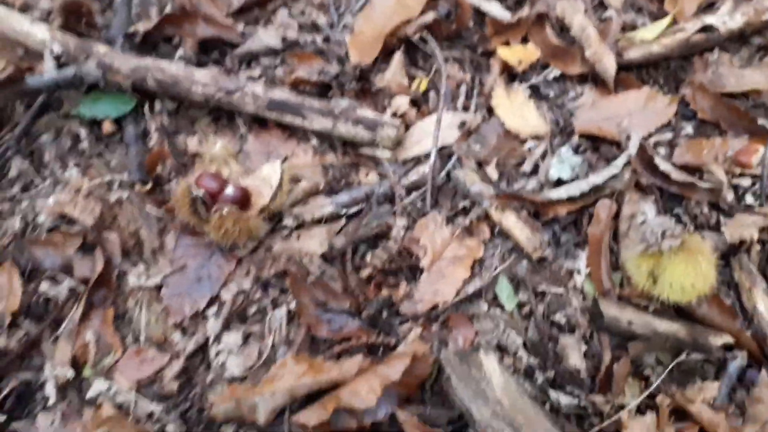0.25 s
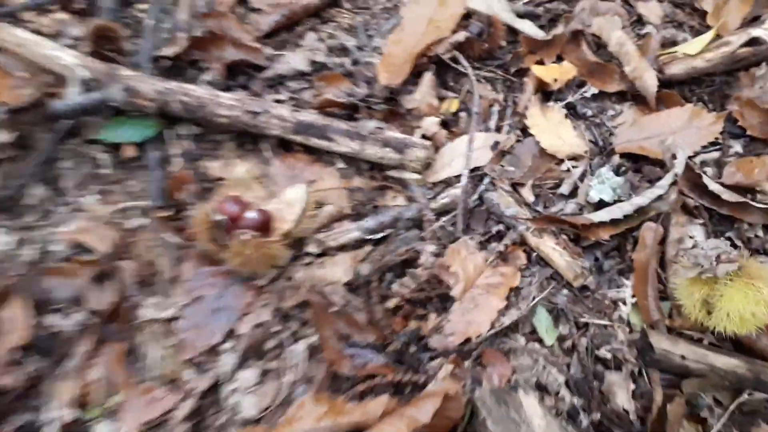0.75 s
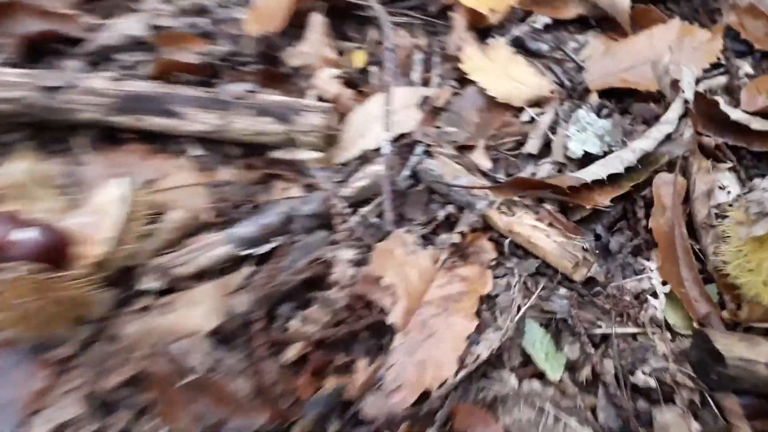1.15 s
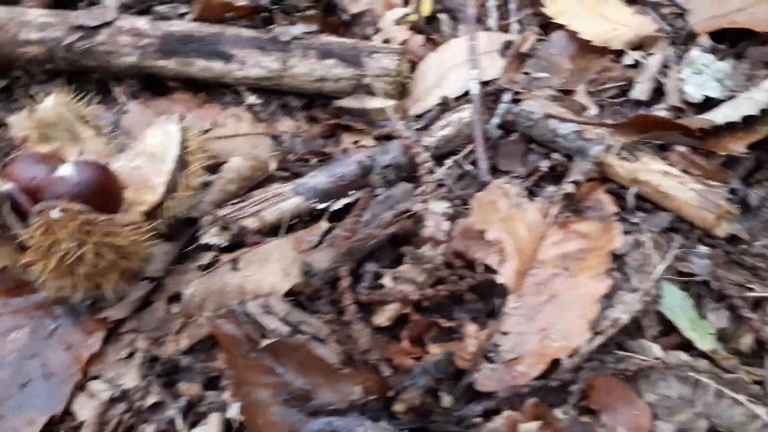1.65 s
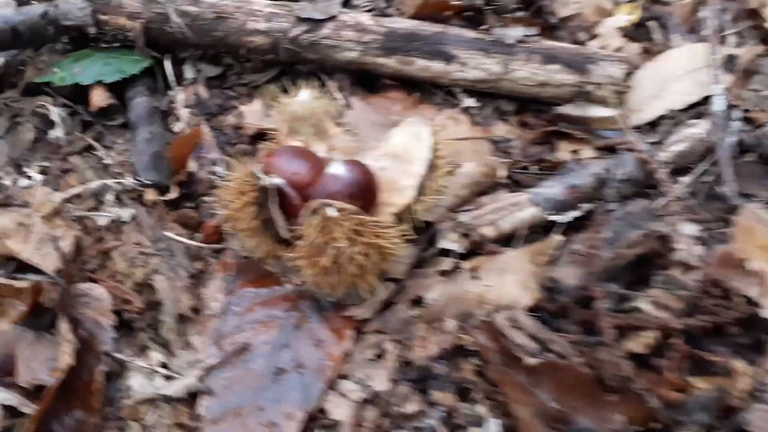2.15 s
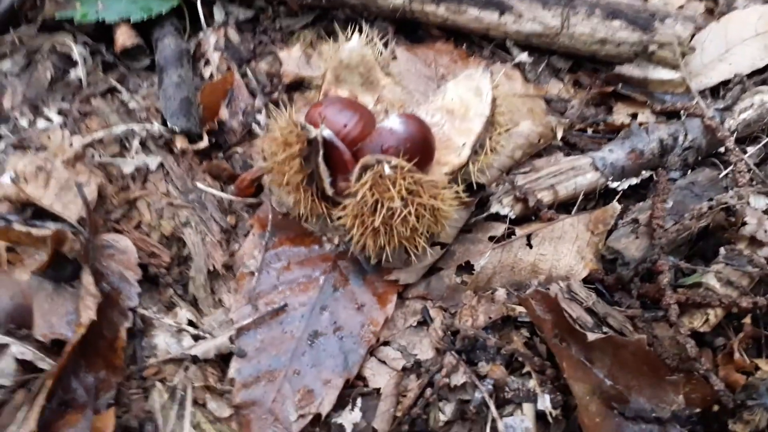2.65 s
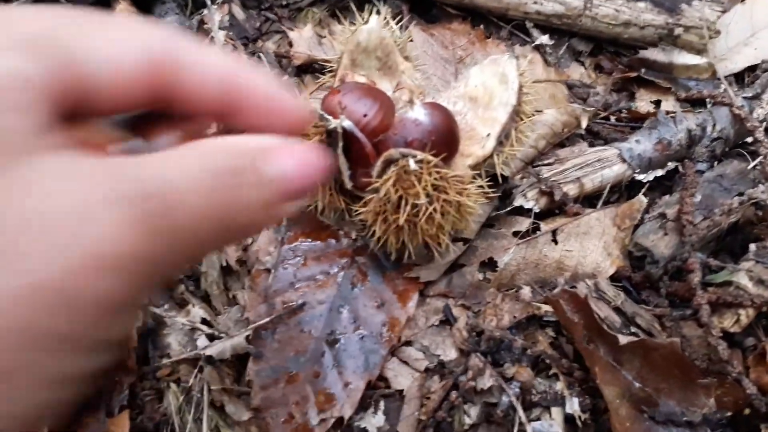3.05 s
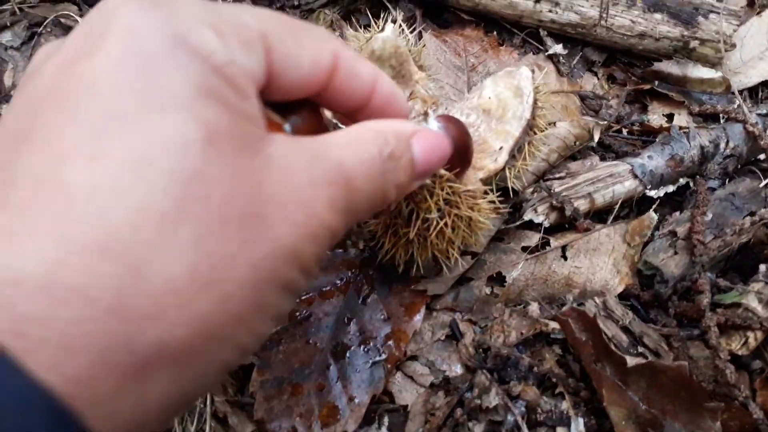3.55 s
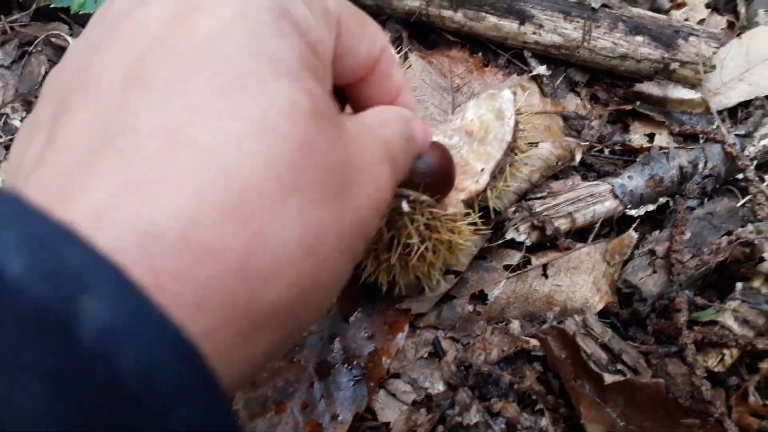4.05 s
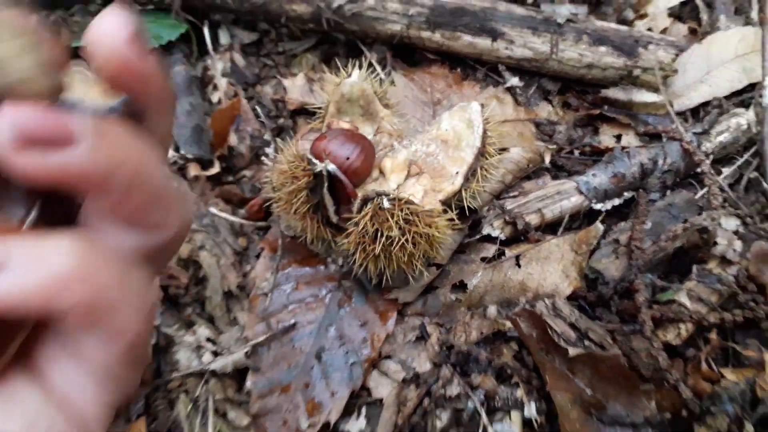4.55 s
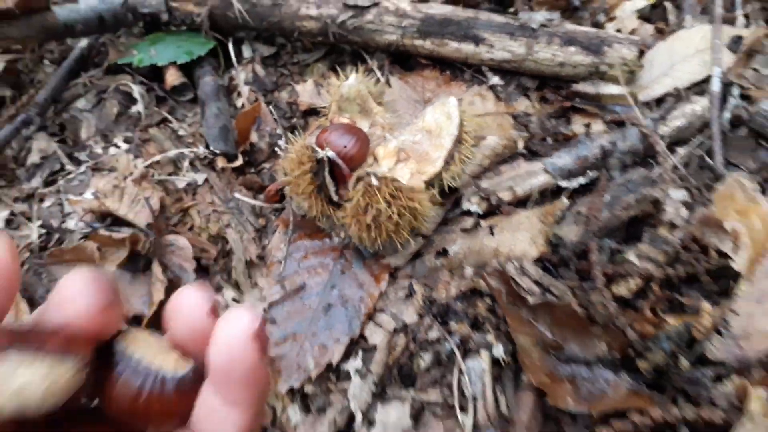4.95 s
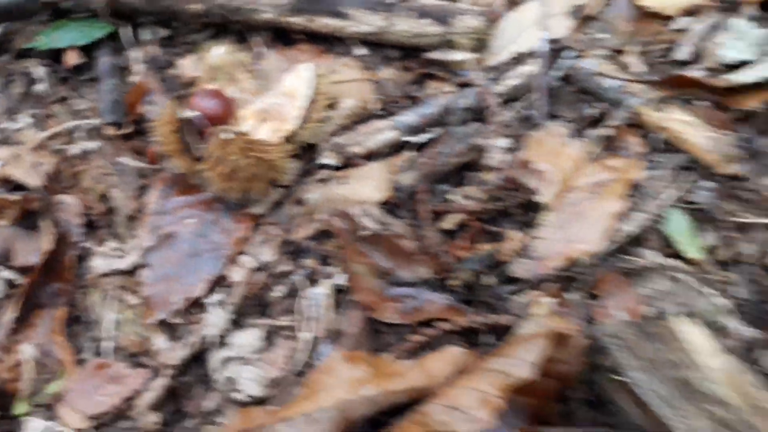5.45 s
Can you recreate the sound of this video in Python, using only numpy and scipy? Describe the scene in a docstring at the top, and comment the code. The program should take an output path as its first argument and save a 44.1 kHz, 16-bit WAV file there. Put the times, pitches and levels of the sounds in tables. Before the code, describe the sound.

A step crushes crisp leaf litter, a twig cracks loudly, then delicate crackles and clicks continue over a soft, airy forest hiss.

```python
"""Dry leaves brush underfoot and the first twigs snap: someone steps through leaf litter in a wood,
crouches and picks a chestnut out of its spiny husk; spines and nuts tick under the fingers.
Snaps are impulses ringing in two damped modes; leaves are random trains of tiny fractures, filtered.
Thuds are damped low sines; cloth is resonant noise; hiss and faint far rumble are coloured noise.
A decaying noise response adds the scatter of the trunks."""
import sys
import numpy as np
from scipy import signal
from scipy.fft import rfft, irfft
from scipy.io import wavfile

SR = 44100
rng = np.random.default_rng(int(sys.argv[2]) if len(sys.argv) > 2 else 0)


def transcribe(signal):
    """Save signal, clipped to [-1, 1], as a 16-bit WAV file at the path in sys.argv[1]."""
    frames = np.atleast_2d(signal).T
    limited = np.clip(frames, -1, 1)
    pcm = np.round(limited * 32767).astype(np.int16)
    wavfile.write(sys.argv[1], SR, pcm)


N = 251370   # samples
TIME = np.arange(N) / SR   # s


def from_db(db):
    """Level definition: decibels to amplitude gain."""
    return 10 ** (np.asarray(db) / 20)


def rms_one(x):
    """Normalization: scale a signal to unit rms."""
    return x / np.sqrt(np.mean(x ** 2) + 1e-20)


def in_time(rows):
    """Linear interpolation: each column of a curve at every sample."""
    s, *columns = np.transpose(rows)
    return [np.interp(TIME, s, c) for c in columns]


def swell(corners_s):
    """Triangular envelope: a linear rise and fall through three times, put in order first."""
    return np.interp(TIME, np.sort(corners_s), [0, 1, 0])


def band(x, low_hz, high_hz, order=2):
    """Band limitation: a causal Butterworth band-pass."""
    edges = [low_hz, min(high_hz, .48 * SR)]
    sos = signal.butter(order, edges, "band", fs=SR, output="sos")
    return signal.sosfilt(sos, x + 1e-18)


def resonance(x, hz, width_hz):
    """Damped resonance: a pole pair whose radius sets the bandwidth, with gain about 1 at its top."""
    r = np.exp(-np.pi * width_hz / SR)
    zeros = (1 - r * r) / 2 * np.array([1, 0, -1])
    poles = [1, -2 * r * np.cos(2 * np.pi * hz / SR), r * r]
    return signal.lfilter(zeros, poles, x)


def coloured(x, spectrum):
    """Minimum phase: a folded cepstrum gives the causal filter of a spectrum, scaled to unit power."""
    size = 8192
    hz, db = np.transpose(spectrum)
    grid = np.maximum(np.arange(size // 2 + 1) * SR / size, 1)
    gain = from_db(np.interp(np.log(grid), np.log(hz), db))
    cepstrum = irfft(np.log(gain))
    cepstrum[1:size // 2] *= 2
    cepstrum[size // 2 + 1:] = 0
    response = irfft(np.exp(rfft(cepstrum)))
    return signal.fftconvolve(x, response / np.linalg.norm(response))[:N]


def grains(per_s, spread_db):
    """Shot noise: tiny fractures at random moments, some larger than the rest; power about 1."""
    sizes = rms_one(from_db(spread_db * np.minimum(rng.exponential(1, N), 3)))
    chance = np.clip(per_s / SR, 1e-6, 1)   # per sample
    breaks = rng.random(N) < chance
    return breaks * sizes * rng.choice([-1, 1], N) / np.sqrt(chance)


def flicker(rate, depth_db):
    """Random amplitude modulation: a gain in dB that heads for a new value rate times a second."""
    steps = rng.standard_normal(4096)
    return from_db(depth_db * np.interp(TIME * rate, np.arange(len(steps)), steps))


# level of the hiss of the wood: t/s, level/dB
HISS_LEVEL = [(0.0, -46.5), (0.13, -50.5), (0.3, -50.5), (0.71, -49.5), (0.84, -52), (1.22, -46),
              (1.48, -52), (1.7, -50.5), (1.89, -48.5), (2.06, -49), (2.35, -52), (2.68, -52.5),
              (3.0, -50.5), (3.35, -52.5), (3.97, -52), (5.22, -50), (5.7, -48)]
# spectrum of the hiss: f/Hz, relative level/dB
HISS_SPECTRUM = [(300, -18.5), (520, -14.5), (780, -4), (1050, -1), (1600, -2), (2500, 1.5), (3400, -0.5),
                 (4500, 1.5), (6000, -6.5), (7800, -9.5), (10000, -7), (11300, -15.5), (14000, -17.5),
                 (16000, -23)]
# hiss ranges, the treble swelling most: low f/Hz, high f/Hz, relative level/dB, follow/(dB per dB of swell)
HISS_BANDS = [(398, 1565, -11.5, 1.0), (1500, 6080, -1.5, 1.0), (5930, 20000, -6.5, 1.1)]
# far rumble: t/s, level/dB
RUMBLE_LEVEL = [(0, -62), (1.0, -64), (2.2, -64), (3.2, -63), (4.8, -62.5), (5.7, -63)]
# spectrum of the rumble: f/Hz, relative level/dB
RUMBLE_SPECTRUM = [(20, -29), (45, -18), (68, 0.5), (100, -3.5), (125, 3.5), (165, -4.5), (240, -6.5),
                   (330, -13), (480, -20.5), (900, -44)]


def wood():
    """Filtered noise: far hiss in three ranges that swell together and stir slightly, over a low rumble."""
    level_db, = in_time(HISS_LEVEL)
    rumble_db, = in_time(RUMBLE_LEVEL)
    usual_db = level_db.mean()
    out = from_db(rumble_db) * coloured(rng.standard_normal(N), RUMBLE_SPECTRUM)
    for low_hz, high_hz, range_db, follows in HISS_BANDS:
        hiss = band(coloured(rng.standard_normal(N), HISS_SPECTRUM), low_hz, high_hz, order=4)
        stirred = rms_one(hiss * flicker(rate=40, depth_db=1.0))
        out += from_db(usual_db + range_db + follows * (level_db - usual_db)) * stirred
    return out


def trunks(x, t60=0.69, echo_db=-26):
    """Diffuse scattering: trunks and ground return a faint, dull tail, decaying 60 dB per t60 seconds."""
    t = TIME[:SR // 2]
    build_up = 1 - np.exp(-t / 0.0076)
    tail = band(rng.standard_normal(len(t)), 700, 4300, order=1) * from_db(-60 * t / t60) * build_up
    return from_db(echo_db) * signal.fftconvolve(x, tail / np.linalg.norm(tail))[:N]


# clothes brushing in the stride and the crouch:
# start t/s, peak t/s, end t/s, level/dB, centre f/Hz, width of each resonance/Hz
CLOTH_SWISHES = [(0, .3, 0.55, -69, 334, 250), (0.93, 1.303, 1.57, -58, 660, 600),
                 (1.15, 1.635, 2.04, -66, 235, 236), (1.75, 2.025, 2.3, -59.5, 2580, 450)]


def clothes():
    """Friction noise: fabric slides on fabric in soft swells, each through one broad double resonance."""
    out = np.zeros(N)
    for start, peak, end, level_db, hz, width_hz in CLOTH_SWISHES:
        rubbing = resonance(resonance(rng.standard_normal(N), hz, width_hz), hz, width_hz)
        out += from_db(level_db) * swell([start, peak, end]) * rms_one(rubbing)
    return out


# weight landing on soft soil: t/s, relative level/dB, f/Hz, decay time/s
SOIL_THUDS = [(.345, -51, 227, .012), (0.357, -36, 220, 0.0042), (.402, -56.5, 275, 0.016),
              (0.791, -54, 217, 0.016)]


def thuds(rise_s=0.0019, crumble_share=0.48):
    """Damped oscillation: soil answers each push with a few low cycles and a dull crumbling."""
    out = np.zeros(N)
    crumbling = crumble_share * rms_one(band(rng.standard_normal(N), 130, 750))
    for s, level_db, hz, decay in SOIL_THUDS:
        t = np.maximum(TIME - s, 0)
        push = (1 - np.exp(-t / rise_s)) * np.exp(-np.minimum(t / decay, 20))
        out += 2 * from_db(level_db) * push * (np.sin(2 * np.pi * hz * t) + crumbling)
    return band(out, 90, 830, order=1)


# how hard the litter is stirred, in the stride, at rest, under the hand and on rising: t/s, effort level/dB
STIRRING = [(0, 5.5), (.75, 3), (1.4, -5), (2.25, 1), (2.55, -7.5), (3.1, -4.5), (3.7, -1), (4.3, -2.5),
            (5.3, -2), (5.7, 1)]
# leaves and spines that crack: low f/Hz, high f/Hz, relative level/dB
LEAF_BANDS = [(1290, 3600, 0.5), (3230, 6600, -1.5), (3000, 6700, 2), (7950, 12000, -2.5),
              (9300, 10600, -6)]
CRACKS_PER_S, CRACKLE_DB = 105, -58.5   # all leaves together, at 0 dB of effort
CRACKS_GROW = 1.2   # dB of rate per dB of effort


def crackle():
    """Random point process: lone cracks, louder and more frequent with effort, each leaf in its own band."""
    effort_db, = in_time(STIRRING)
    per_s = CRACKS_PER_S * from_db(CRACKS_GROW * effort_db)
    cracks = np.zeros(N)
    for low_hz, high_hz, leaf_db in LEAF_BANDS:
        clicks = grains(per_s / len(LEAF_BANDS), spread_db=4.5)
        cracks += from_db(leaf_db) * rms_one(band(clicks, low_hz, high_hz))
    return from_db(CRACKLE_DB + effort_db) * rms_one(cracks)


# shoes brushing through leaves, the three times in any order:
# start t/s, peak t/s, end t/s, level/dB, share of fine fizz (0-1, of power)
LEAF_SCUFFS = [(0, 0.001, 0.11, -42.5, 0.08), (.06, 0.096, 0.12, -37, 0), (0.126, .14, 0.23, -49.5, 0.7),
               (0.33, 0.355, 0.37, -35, .3), (0.35, .409, 0.44, -41, 0.8), (.43, 0.588, 0.7, -43, 0.74),
               (0.723, 0.75, .765, -47, .3), (.82, 0.864, 0.95, -45.5, 0.6), (0.96, 1.12, 1.6, -51, 0.7),
               (5.487, 5.534, 5.46, -46, 1)]
# spectrum of the papery part: f/Hz, relative level/dB
PAPER_SPECTRUM = [(60, -51), (200, -30), (450, -12), (750, -15.5), (1200, -28), (2400, -25), (3500, -1.5),
                  (4600, 2.5), (5800, -16.5), (7800, -14), (10000, 0.5), (11500, -9), (16000, -21)]
# spectrum of the fine fizz: f/Hz, relative level/dB
FIZZ_SPECTRUM = [(60, -15), (300, -7), (750, 9.5), (1200, -2.5), (2500, 8), (4000, 6.5), (7500, 3.5),
                 (10000, -6), (12500, 3), (16000, -4)]


def scuffs():
    """Stick-slip friction: leaves slide in swells of clumped grains, partly papery, partly a fine fizz."""
    papery, fizzy = np.zeros(N), np.zeros(N)   # powers
    for start, peak, end, level_db, fizz in LEAF_SCUFFS:
        power = from_db(level_db) ** 2 * swell([start, peak, end]) ** 2
        share = np.clip(fizz, 0, 1)
        papery += power * (1 - share)
        fizzy += power * share
    catching = rms_one(flicker(rate=410, depth_db=3.5))   # edges catch and slip
    paper_grains = np.sqrt(papery) * catching * grains(per_s=6600, spread_db=6.0)
    fizz_grains = np.sqrt(fizzy) * catching * grains(per_s=6500, spread_db=6.0)
    return coloured(paper_grains, PAPER_SPECTRUM) + coloured(fizz_grains, FIZZ_SPECTRUM)


# the sole crushing the litter: t/s, level/dB
SOLE_CRUSH = [(.765, -46), (.781, -38.5), (.79, -29.5), (.801, -33.5), (.813, -30), (.825, -29.5),
              (.834, -32), (.845, -42), (.87, -62)]
# spectrum of the crushing: f/Hz, relative level/dB
CRUSH_SPECTRUM = [(50, -43), (130, -22.5), (450, -20.5), (1050, -15), (1350, -18), (2300, -11.5),
                  (3600, -6), (5200, -14.5), (8000, -17.5), (10000, -19.5), (16000, -19)]


def crush():
    """Dense fracture noise: under the full weight many leaves break at once, in quick clumps."""
    level_db, = in_time(SOLE_CRUSH)
    pressed = (TIME > SOLE_CRUSH[0][0]) & (TIME < SOLE_CRUSH[-1][0])
    clumps = rms_one(flicker(rate=500, depth_db=1.0))
    breaking = pressed * from_db(level_db) * clumps * grains(per_s=4200, spread_db=5.5)
    return coloured(breaking, CRUSH_SPECTRUM)


# twigs, stalks and spines that snap clearly: t/s, knock level/dB, crack level/dB, tick level/dB,
# decay time of the tearing/s, low mode f/Hz, high mode f/Hz
CLEAR_SNAPS = [(0.08, -62, -42, -43, .0018, 1980, 9860), (0.231, -60, -43.5, -51, .0008, 2070, 4800),
               (0.3254, -52, -43, -51, 0.0014, 2480, 5040), (0.3875, -40, -38, -44, .0009, 2340, 4260),
               (0.428, -49, -43, -46, 0.0016, 2090, 3850), (0.4905, -64, -40, -32.5, .0006, 2370, 9200),
               (0.661, -49, -39, -42.5, .002, 1880, 4440), (0.667, -40.5, -43, -60, 0.0012, 1430, 3320),
               (0.7366, -56, -42, -61, .0017, 2350, 4500), (0.795, -33, -25.5, -52, .0014, 1000, 3940),
               (0.8054, -36.5, -25, -50, .0022, 1150, 3440), (0.817, -36, -25.5, -52, .0007, 1810, 3920),
               (0.8234, -44, -27.5, -37, 0.0039, 2400, 3940), (0.906, -47, -41.5, -42.5, .001, 1850, 2970),
               (1.049, -69, -37.5, -59, .0025, 1490, 4300),
               (1.0714, -31.5, -42, -34.5, 0.00081, 1880, 4700),
               (1.2535, -26.5, -14, -33, 0.00087, 1710, 4930), (1.4998, -45, -52, -65, 0.00054, 2150, 3290),
               (1.642, -55, -56, -46, 0.0024, 2450, 4200), (1.758, -44, -44, -53, 0.0014, 1160, 3100),
               (2.121, -66, -44.5, -50, .0007, 2480, 5120), (2.3398, -64, -50.5, -52, .0008, 2280, 5840),
               (2.412, -54, -48, -68, .0007, 2130, 4870), (2.7206, -49.5, -62, -51, .0016, 2000, 4090),
               (2.9225, -47.5, -57, -54, .0008, 1960, 4260), (3.1138, -49, -27, -42, 0.00027, 2500, 4000),
               (3.2224, -37.5, -42, -47, 0.0013, 2080, 8050), (3.253, -41, -43, -40, .0024, 900, 5230),
               (3.582, -52, -48, -49.5, .0025, 2170, 2930), (3.6347, -65, -48.5, -48.5, .0015, 1980, 8400),
               (3.8399, -60, -42.5, -36, 0.00055, 2090, 7000), (3.8682, -53, -54, -46, .0008, 2350, 4520),
               (4.0132, -70, -49.5, -39.5, 0.0013, 2280, 9800),
               (4.1326, -56, -47.5, -52, .0009, 1590, 3270), (4.1415, -66, -52, -49, .0008, 2070, 7770),
               (4.321, -43, -47, -45, 0.0033, 1950, 4600), (4.374, -66, -43, -50, 0.0011, 2330, 5500),
               (4.395, -37, -43, -41.5, .0012, 2040, 3700), (4.5727, -46.5, -57, -48.5, .003, 2020, 4500),
               (4.8347, -64, -45, -44.5, 0.0013, 1830, 10200),
               (4.8532, -44, -37.5, -40, 0.0017, 2620, 4000), (4.923, -64, -44.5, -45, .0014, 1740, 7800),
               (5.129, -42, -40, -39.5, 0.00057, 2505, 4300),
               (5.2277, -42.5, -68, -61, 0.00083, 2000, 3830),
               (5.5261, -45.5, -43.5, -49, 0.00062, 1690, 5140)]
# bands of knock, crack, tick and splinter: low f/Hz, high f/Hz
FRACTURE_BANDS = [(720, 3300), (2900, 6050), (6700, 11400), (11500, 16000)]
SPLINTERS = .16   # noise of the tearing, relative to the fracture impulse
SPLINTER_DB, SPLINTER_GROWS = -11, 1.15   # splinter level at a 0 dB crack; dB per dB of crack


def snaps(shiver_share=0.12, shiver_s=0.0031, strain_share=0.2, strain_s=0.000099,
          low_db=5.0, high_db=8.5, low_width_hz=450, high_width_hz=1200):
    """Impulse excitation: fibres strain, fracture and tear on briefly; the piece rings in two damped modes."""
    size, lead, span = 1500, 90, 270   # samples: whole piece, before the fracture, end of level window
    t, out = (np.arange(size) - lead) / SR, np.zeros(N + size)
    times, knock_db, crack_db, tick_db, *shapes = np.transpose(CLEAR_SNAPS)
    straining = strain_share * np.exp(-abs(t) / strain_s)
    shivering = shiver_share * np.exp(-abs(t) / shiver_s)   # the litter around trembles on
    pieces = []
    for lasts, low_hz, high_hz in zip(*shapes):
        tearing = np.exp(-abs(t) / max(lasts, 1 / SR))
        roughness = np.where(t < 0, straining, tearing + shivering)
        force = (t == 0) + SPLINTERS * rng.standard_normal(size) * roughness
        low = from_db(low_db) * resonance(force, low_hz, low_width_hz)
        high = from_db(high_db) * resonance(force, high_hz, high_width_hz)
        pieces.append(force + low + high)
    splinter_db = SPLINTER_GROWS * crack_db + SPLINTER_DB
    sounds = np.zeros((len(pieces), size))
    for k, level_db in enumerate((knock_db, crack_db, tick_db, splinter_db)):
        part = band(np.array(pieces), *FRACTURE_BANDS[k], order=3)
        # levels are rms over about 4 ms; neighbouring bands have opposite sign
        early = np.sqrt(np.sum(part[:, :span] ** 2, axis=1, keepdims=True) / (span - lead))
        sounds += (-1) ** k * part / early * from_db(level_db)[:, None]
    for s, sound in zip(times, sounds):
        at = int(s * SR) - lead
        out[at:at + size] += sound
    return out[:N]


def scene():
    """Superposition: near sounds, their scatter and the wood behind."""
    near = snaps() + scuffs() + crush() + thuds() + crackle() + clothes()
    return (near + trunks(near) + wood())[None]


CUTOFF_HZ = 15800


def record(dry):
    """Saturation and band limitation: high peaks are rounded and the top is cut steeply."""
    rounded = np.tanh(dry)
    steep = signal.ellip(12, .1, 80, CUTOFF_HZ, fs=SR, output="sos")
    return signal.sosfilt(steep, rounded)


dry = scene()
out = record(dry)
transcribe(out)
```